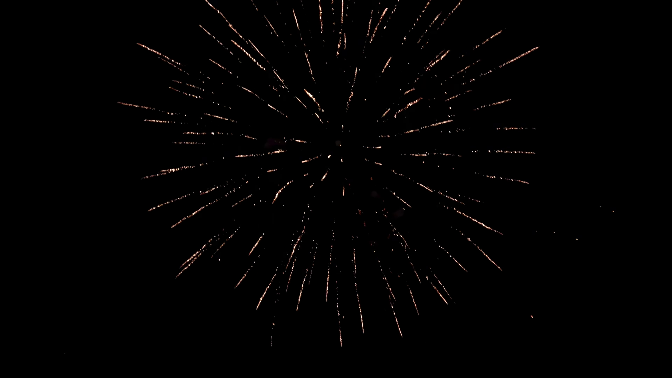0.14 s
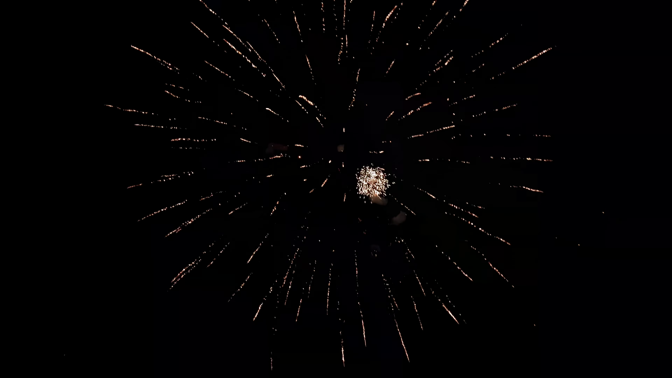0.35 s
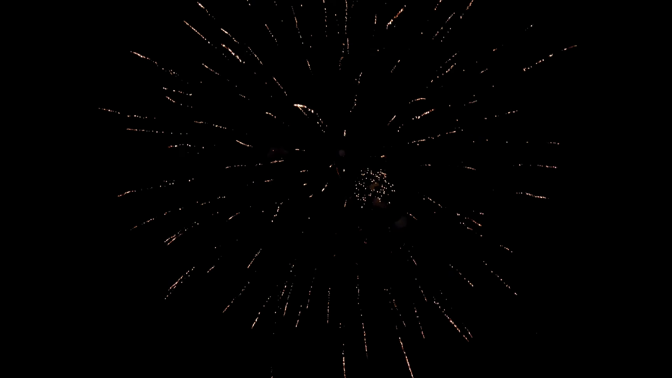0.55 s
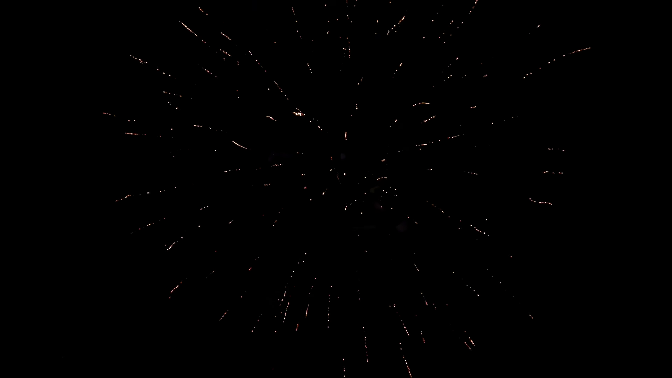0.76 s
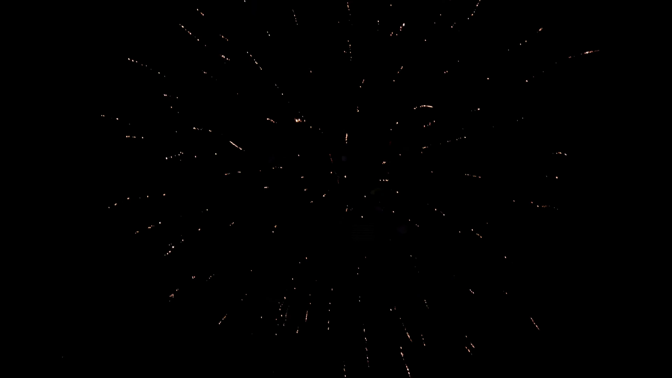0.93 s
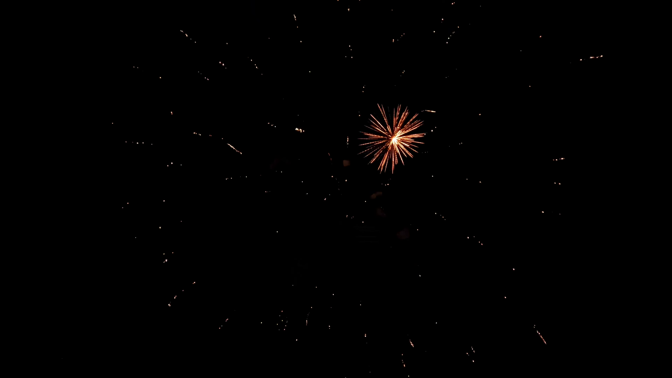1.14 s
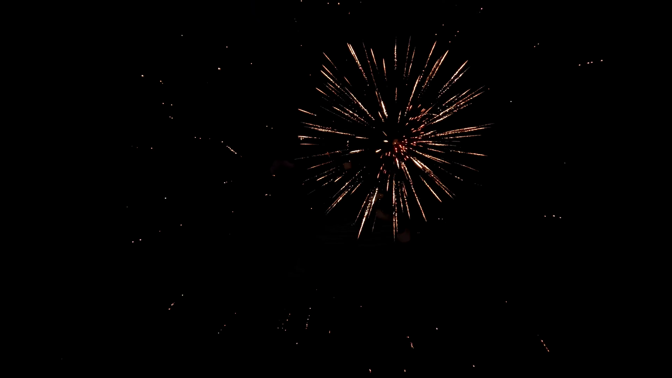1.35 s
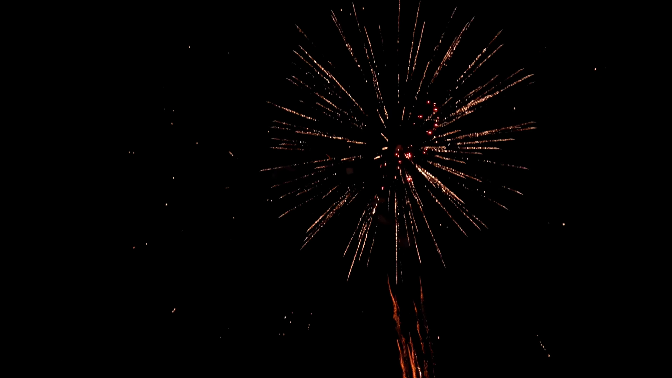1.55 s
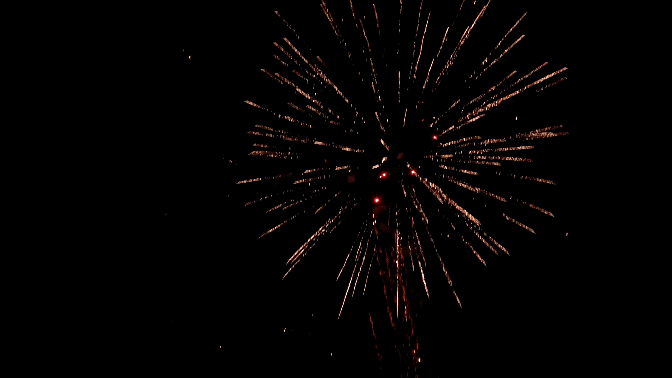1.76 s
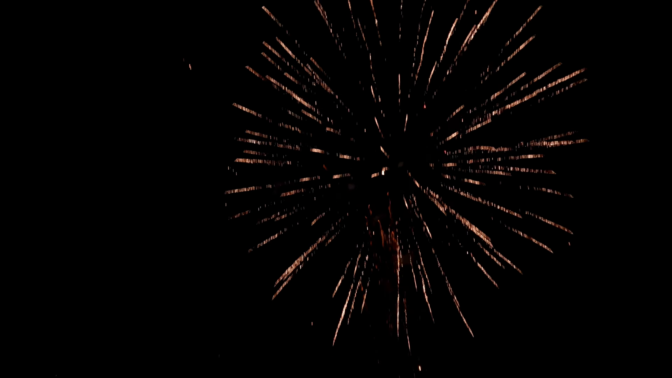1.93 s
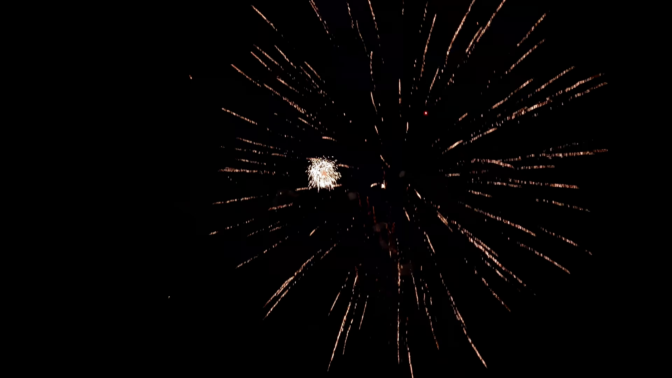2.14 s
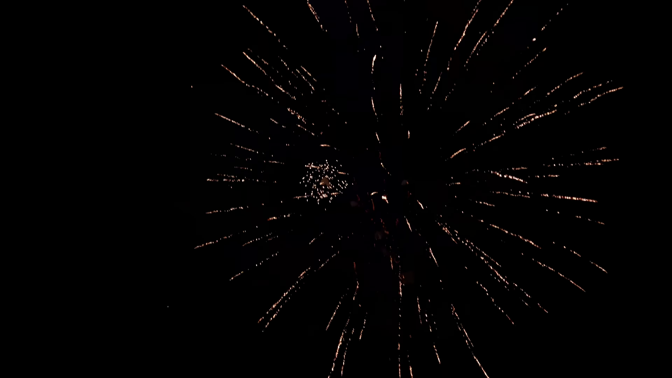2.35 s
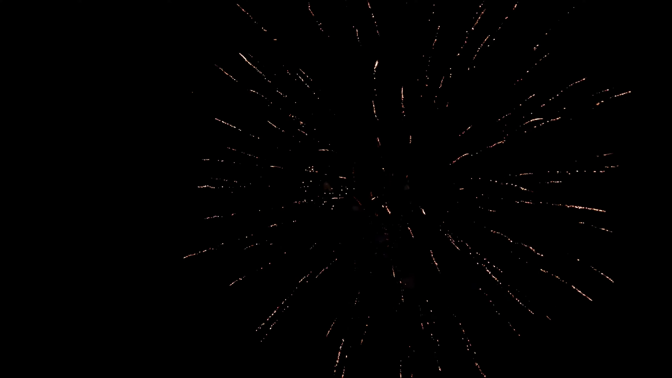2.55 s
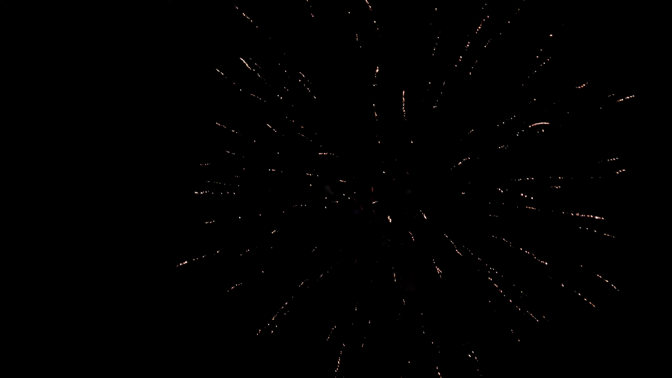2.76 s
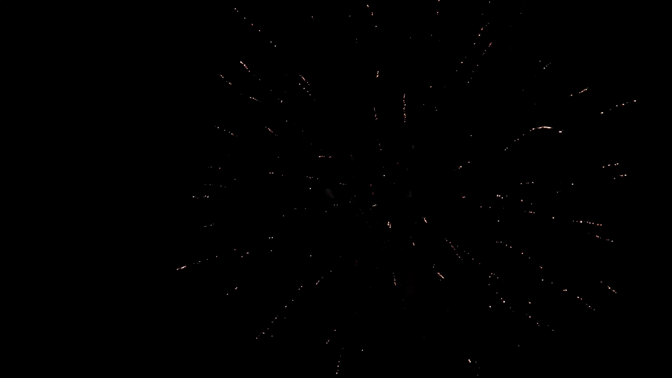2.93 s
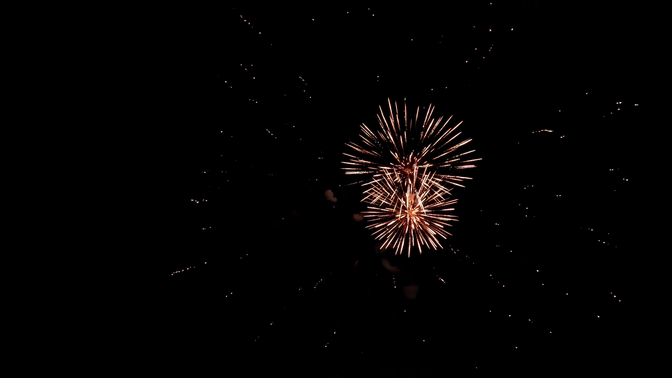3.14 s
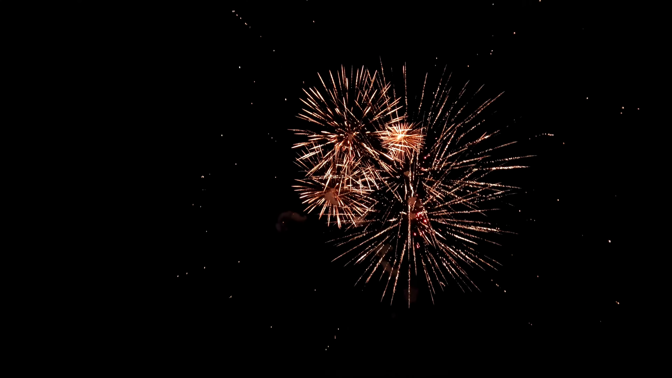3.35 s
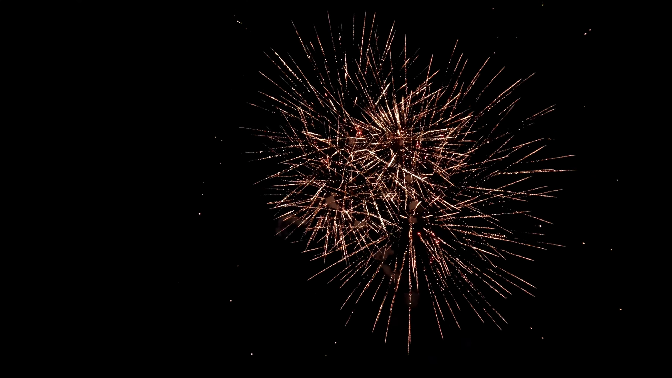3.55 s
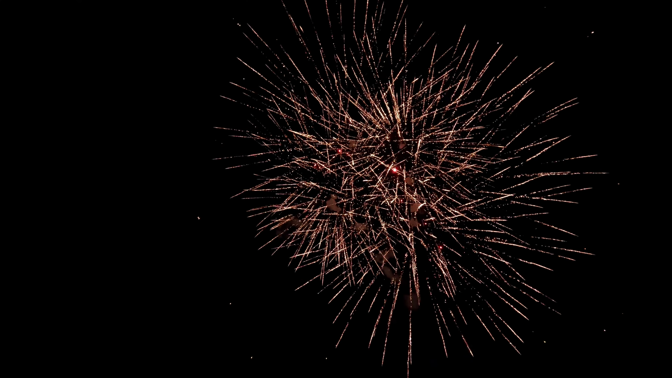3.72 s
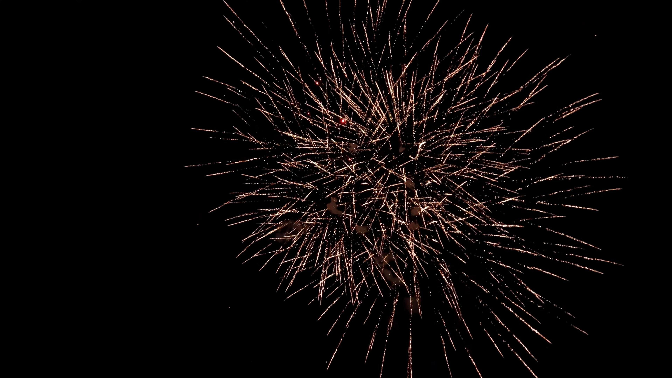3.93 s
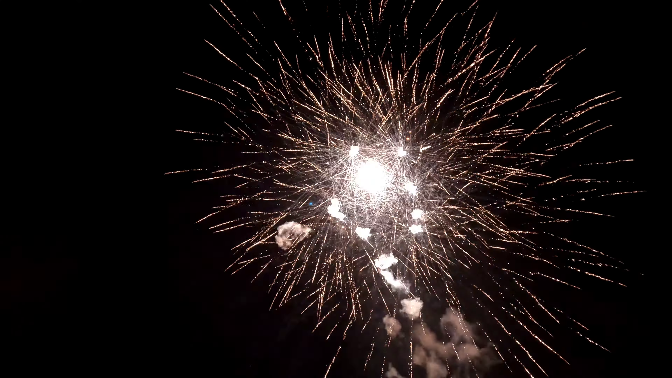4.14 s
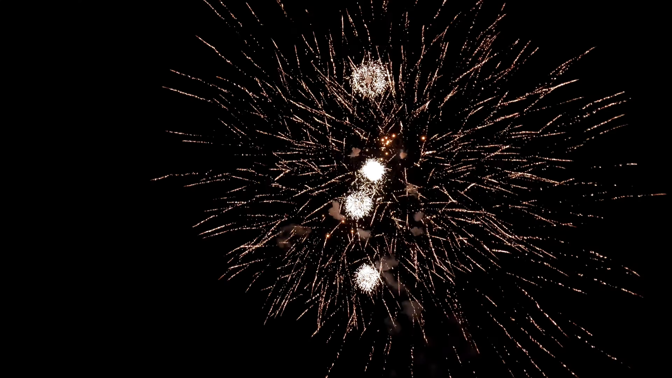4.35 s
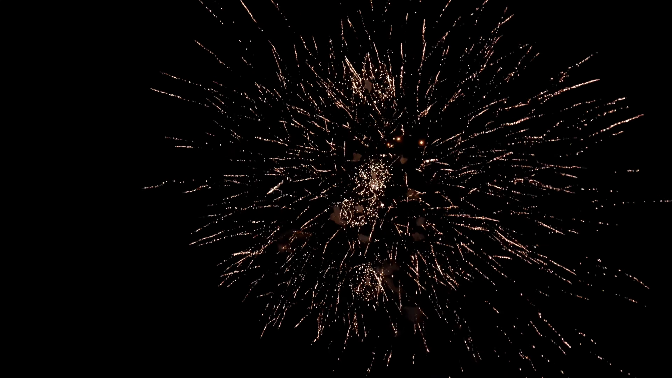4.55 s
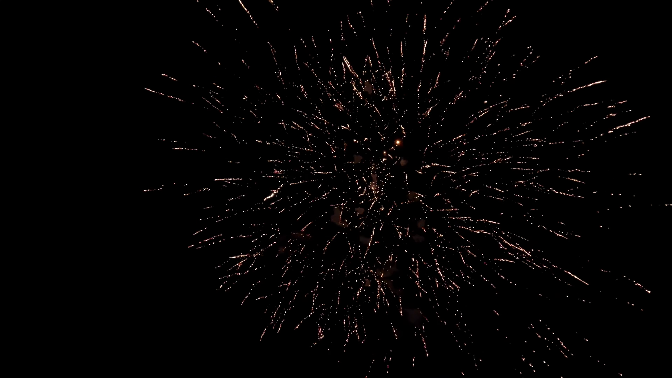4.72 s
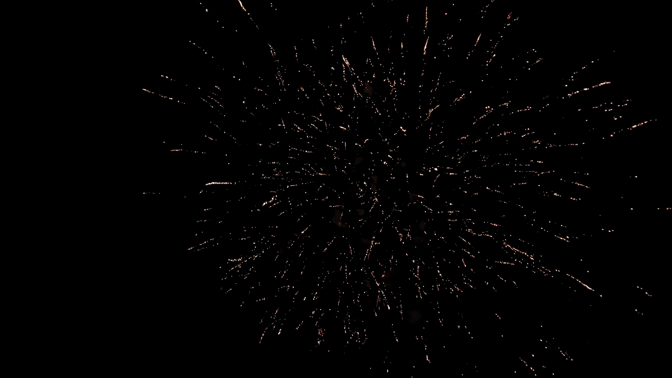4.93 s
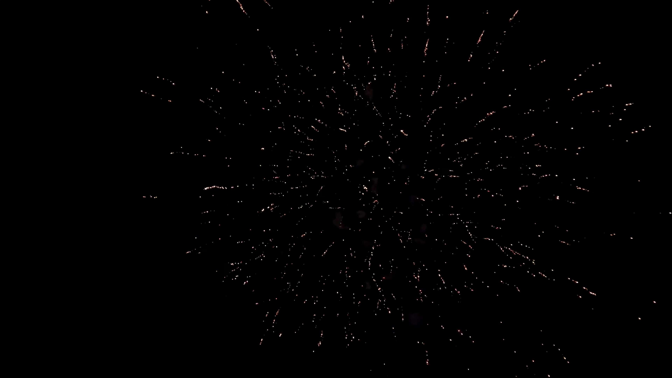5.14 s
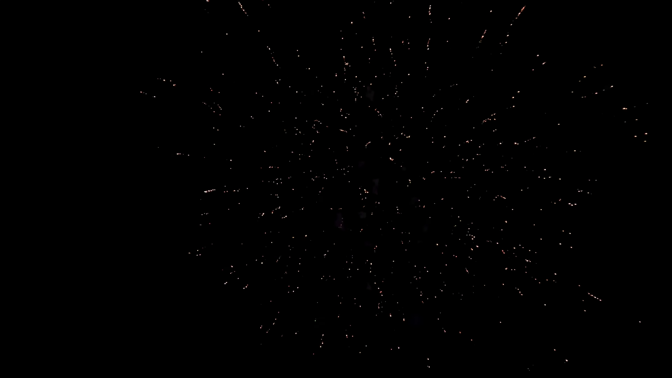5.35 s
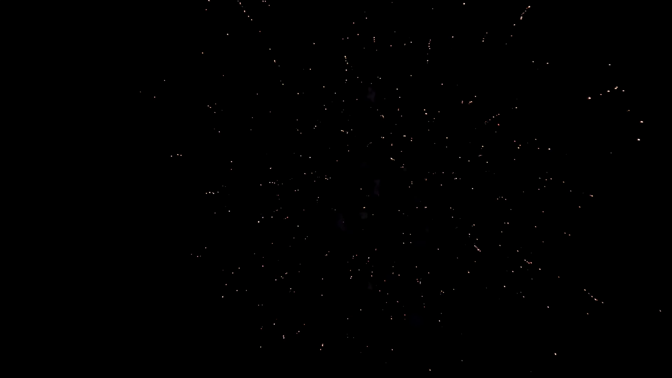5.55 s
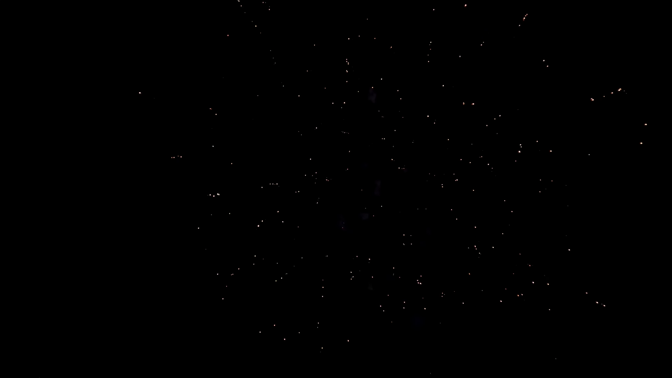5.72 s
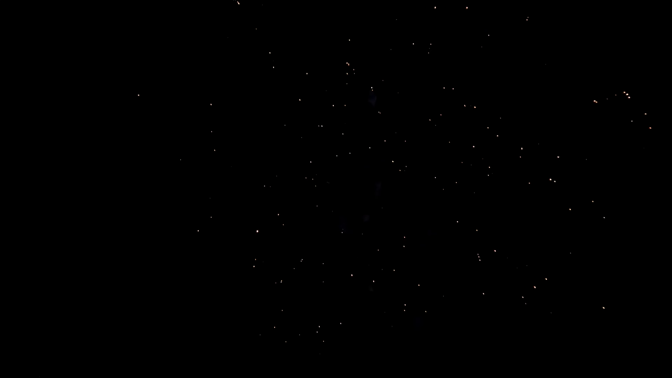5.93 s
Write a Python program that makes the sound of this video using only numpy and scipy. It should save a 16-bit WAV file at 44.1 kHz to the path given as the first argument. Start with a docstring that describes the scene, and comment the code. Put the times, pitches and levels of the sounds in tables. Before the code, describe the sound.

Fireworks go off outdoors over quiet night air, a distant rumble and the faint crackle of burning sparks. At about 0.6 seconds a shell bursts overhead with a sharp bang. From 1.4 to 1.7 seconds five launches leave their tubes in a rapid volley of spitting thumps that slap off a nearby wall, with another burst and small dry cracks among them. A single strong bang comes at 2.4 seconds. Five loud bangs crowd together between 3.4 and 3.7 seconds, and five more overlap between 4.6 and 4.8 seconds, joined by low thuds. Every blast echoes off distant obstacles and rolls away for about a second as a low rumble and a bright, hissing wash. The last echoes fade to a small crack near 5.5 seconds and a few dull, far thuds around 5.9. The sound is nearly mono, with the loudest bangs squashed.

```python
"""Firework shells bursting overhead at night, heard outdoors on a nearly mono microphone.
Each blast brings a dull reflection off the ground, then rolls away over the land as a low rumble and a
bright wash, and the same far obstacles answer every shell. Early on, five more leave the cake's tubes
in a volley that slaps off a nearby wall. Dull thuds and a few small cracks lie between,
over the night air; the recorder's limiter squashes the bangs."""
import sys
import numpy as np
from scipy import signal
from scipy.fft import rfft, irfft, next_fast_len
from scipy.io import wavfile
from scipy.ndimage import uniform_filter1d

SR = 44100
rng = np.random.default_rng(int(sys.argv[2]) if len(sys.argv) > 2 else 0)


def materialize(psi):
    """Save the field psi as 16-bit PCM at rate SR to the path in sys.argv[1].

    A 1-D psi becomes a single channel; in a 2-D psi each row is a channel.
    """
    bounded = np.clip(np.atleast_2d(psi).T, -1, 1)
    quanta = np.round(bounded * 32767).astype(np.int16)
    wavfile.write(sys.argv[1], SR, quanta)


N = 263894

# the display's roll in the distance: (time [s], rumble level [dB], wash level [dB])
DISTANT_ROLL = [(0, -39, -41.5), (.27, -41.5, -48.5), (1.3, -38.5, -45.5), (2.15, -53.5, -52),
                (3.1, -37.5, -48), (3.9, -40, -40), (4.5, -38, -44), (5.7, -38, -43.5),
                (5.98, -31.5, -44.5)]
# low thuds: (time [s], level [dB], decay [s], centre [Hz])
DULL_THUDS = [(0.489, -28.5, 0.016, 204), (1.407, -1, 0.0054, 354), (3.260, -30, 0.026, 184),
              (4.715, -13, 0.063, 143), (4.764, -10.5, 0.028, 161), (5.832, -23.5, 0.024, 222),
              (5.891, -26, 0.026, 197), (5.921, -20.5, 0.023, 394), (5.938, -22.5, 0.035, 180)]
# shells overhead: (time [s], level [dB], crack [dB re blast], shock width [s], size [ratio],
# knock pitch [Hz], rumble level [dB], wash level [dB], low far echoes [dB re rumble])
SHELLS = [(0.6260, -3.5, -0.5, 0.00043, 1.04, 1737, -23, -32, 4.5),
          (1.5030, -1.5, -2.5, 0.00011, 1.02, 690, -29.5, -38, -3),
          (2.4412, 0.5, 0, 0.00021, 1.14, 600, -19.5, -31, 1.5),
          (3.3926, 3, 0, 0.00035, 1.05, 618, -22, -35, -3),
          (3.4491, -1.5, -2, 0.000081, 1, 680, -25.5, -41, 6.5),
          (3.6314, 6.5, -2.5, 0.00042, 0.9, 655, -21.5, -48, -2),
          (3.6775, 0, -3.5, .00013, 0.96, 696, -28, -38.5, -0.5),
          (3.7319, -1.5, -3, 0.00008, .97, 690, -30, -36, 1.5),
          (4.6119, 2, 0, 0.00027, 1, 650, -24.5, -33.5, 2),
          (4.6171, -2.5, -1.5, 0.000073, 0.95, 693, -26, -40, -3),
          (4.6912, -1.5, -2.5, 0.000076, 1.31, 705, -24.5, -39, -5),
          (4.7559, -3.5, -2, 0.00011, 1.01, 690, -26, -37.5, 0.5),
          (4.7624, -7.5, -1.5, 0.000087, 1.09, 680, -28, -39.5, -0.5)]
# short dry cracks and bright echoes: (time [s], level [dB], decay [s], treble corner [Hz])
SMALL_CRACKS = [(.646, -21, 0.002, 5000), (.783, -27, 0.0016, 4000), (1.4531, -24, 0.0016, 3970),
                (1.5328, -12, 0.0014, 5000), (1.547, -15, 0.0038, 3480), (1.6038, -18, .002, 4000),
                (1.611, -19, 0.0021, 5000), (2.623, -28, 0.0056, 4500), (2.985, -37, .012, 4500),
                (3.04, -37, .016, 4500), (3.878, -30.5, 0.022, 4520), (4.6991, -13, 0.00071, 7050),
                (4.711, -22, 0.014, 4500), (4.729, -15, .002, 3200), (5.479, -24.5, 0.002, 2770),
                (5.921, -25.5, 0.0038, 2630)]
# far obstacles: (delay [s], low echo [dB re shell's rumble], bright echo [dB re shell's wash])
OBSTACLES = [(.028, -2, -6), (.118, -15, -14), (.172, -0.5, 1.5), (.290, 0.5, -13), (.408, -10, -5.5),
             (.492, -11.5, -7.5), (.545, -22, -11.5)]
# lift charges in the tubes: (time [s], thump level [dB], gas spit level [dB], report level [dB],
# wall echo [dB re thump], rumble level [dB], wash level [dB])
LIFT_CHARGES = [(1.4240, 0, -11.5, 6.5, -.5, -20, -29), (1.4740, -1, -20.5, -6, -3, -28, -30),
                (1.5339, -2.5, -21, -12, -5, -25, -36.5), (1.5847, -0.5, -14.5, -6, -4, -28.5, -37.5),
                (1.6330, -0.5, -17, -5, -3, -25.5, -37.5)]
# spectra of low and bright echoes, night air, shell crack and escaping gas: (frequency [Hz], level [dB])
RUMBLE_SPECTRUM = [(25, -39), (50, -32), (80, -7), (115, -8), (155, 2), (195, 0.5), (245, 1), (330, -9),
                   (550, -15.5), (900, -24), (2000, -30), (5000, -65)]
WASH_SPECTRUM = [(100, -22), (350, 8.5), (600, 3), (1000, -2.5), (2000, -2), (3000, -4), (4100, -5.5),
                 (5200, -13.5), (7300, -17), (8800, -32.5), (11000, -44), (15000, -71.5)]
AIR_SPECTRUM = [(20, -38), (60, -1.5), (190, -8), (270, -2.5), (420, -10), (750, -17), (1500, -15.5),
                (3600, -23), (7000, -36.5), (12000, -92)]
CRACK_SPECTRUM = [(300, -26), (700, -16), (1100, 1.5), (1900, 8), (3700, 11.5), (5200, 0.5), (7000, 0),
                  (10000, -10.5), (14500, -21)]
SPIT_SPECTRUM = [(300, -12), (900, 6.5), (1900, 5.5), (2900, 7), (4200, 3.5), (5300, -7), (7500, -7.5),
                 (10000, -30.5), (14500, -34)]
# how long the wash hangs over the land: (frequency [Hz], time to fall 60 dB [s])
WASH_DECAY = [(300, 1.23), (1000, 1.5), (3000, 1.49), (5000, 1.35), (8000, 0.93), (14000, 0.16)]
# stereo width at the microphone: (frequency [Hz], side level [dB re mid])
STEREO_WIDTH = [(25, -24), (70, -36), (250, -52), (500, -37.5), (1000, -36), (4000, -28.5), (8000, -12),
                (12000, -10)]


def amp(db):
    return 10 ** (np.asarray(db) / 20)


def unit_rms(x):
    return x / np.sqrt(np.mean(x ** 2) + 1e-20)


def curve_at(points, hz):
    point_hz, value = np.transpose(points)
    return np.interp(np.log(hz + 1), np.log(point_hz + 1), value)


def add(mix, start_s, sound):
    part = mix[max(round(start_s * SR), 0):][:len(sound)]
    part += sound[:len(part)]


def colour(x, spectrum):
    """Filters x by a spectrum of (frequency [Hz], level [dB]) points."""
    size = next_fast_len(len(x), real=True)
    gain = amp(curve_at(spectrum, np.fft.rfftfreq(size, 1 / SR)))
    return irfft(rfft(x, size) * gain, size)[:len(x)]


def noise(spectrum, size):
    return unit_rms(colour(rng.standard_normal(size), spectrum))


def lowpass(x, hz, order=2):
    return signal.sosfilt(signal.butter(order, min(hz, .45 * SR), fs=SR, output="sos"), x)


def flutter(size, rate_hz, depth_db):
    """A random gain that breaks a sound into clumps."""
    knots = np.arange(size) * rate_hz / SR
    return amp(depth_db * np.interp(knots, np.arange(2048), rng.standard_normal(2048)))


def night_ambience(pops_per_s=170, pop_s=0.0054, pops_db=-14, air_db=-51.5):
    """Open night air, the distant roll of earlier shots and the faint crackle of burning stars."""
    times, *levels = np.transpose(DISTANT_ROLL)
    roll_gain, hiss_gain = (amp(np.interp(np.arange(N) / SR, times, db)) for db in levels)
    roll = roll_gain * noise(RUMBLE_SPECTRUM, N) * flutter(N, 23, 3.2)
    pops = (rng.random(N) < pops_per_s / SR) * rng.uniform(.2, 1, N)
    sparks = unit_rms(signal.lfilter([1], [1, -np.exp(-1 / (pop_s * SR))], pops))
    grain = flutter(N, 60, .8) + amp(pops_db) * sparks
    hiss = hiss_gain * lowpass(noise(WASH_SPECTRUM, N) * grain, 4000)
    return roll + hiss + amp(air_db) * noise(AIR_SPECTRUM, N)


def thud(db, decay_s, hz, rise_s=0.0029):
    """A dull bang of noise, falling off by the octave around its centre."""
    t = np.arange(8192) / SR
    hump = [(hz / 4, -60), (hz / 1.15, 0), (hz * 1.15, 0), (hz * 64, -110)]
    return amp(db) * noise(hump, len(t)) * (1 - np.exp(-t / rise_s)) ** 2 * np.exp(-t / decay_s)


def dull_thuds():
    """Low thuds: one just before the volley, others from far off."""
    out = np.zeros(N)
    for start, db, decay_s, hz in DULL_THUDS:
        add(out, start, thud(db, decay_s, hz))
    return out


def blast(t, low_hz=190, sweep_hz=670, sweep_s=.0015, length_s=.0078):
    """A pressure swing that slows as the low frequencies lag behind."""
    age = np.maximum(t, 0)
    turns = low_hz * age + sweep_hz * sweep_s * (1 - np.exp(-age / sweep_s))
    return (t >= 0) * .66 * np.cos(2 * np.pi * turns) * np.exp(-(age / length_s) ** 3)


def shock(t, width_s):
    """A steep front followed by suction."""
    widths = np.maximum(t, 0) / width_s
    return (t >= 0) * (1 - widths) * np.exp(-widths)


def ring(t, hz, decay_s):
    """A damped swing that starts at t = 0."""
    age = np.maximum(t, 0)
    return np.sin(2 * np.pi * hz * age) * np.exp(-age / decay_s)


def shell_crack(t, width_s, knock_hz, rear_s=0.001736, debris_s=0.0019, wide_s=0.00033):
    """Two shock fronts; a wider shock drags more debris noise and woody knock behind it."""
    fronts = 1.76 * shock(t, width_s) + 0.69 * shock(t - rear_s, width_s)
    debris = amp(-8) * noise(CRACK_SPECTRUM, len(t)) * np.exp(-t / debris_s)
    knock = amp(-3.5) * ring(t + 0.00054, knock_hz, decay_s=.0026)
    return fronts + np.sqrt(width_s / wide_s) * (debris + knock)


def shell_bursts(ground_s=0.00751, ground_hz=330, octaves_per_db=0.32):
    """Shells overhead: blast and crack reach the microphone first, then the reflections and tails."""
    out, t = np.zeros(N), np.arange(2048) / SR
    for start, db, crack_db, width_s, size, knock_hz, rumble_db, wash_db, _ in SHELLS:
        crack = amp(crack_db) * shell_crack(t, width_s, knock_hz)
        top_hz = 5850 * 2 ** (octaves_per_db * crack_db)  # a stronger crack is brighter
        direct = lowpass(blast(t / size) + crack, top_hz)  # a bigger shell swings more slowly
        ground = amp(0.5) * lowpass(blast((t - ground_s) / size), ground_hz, order=3)
        add(out, start, amp(db) * (direct + ground))
        for lag_s in (.009, .0198):  # two faint reflections from close by
            add(out, start + lag_s, amp(db - 20) * lowpass(crack, 5200, order=8))
        add(out, start, rumble(rumble_db))
        add(out, start, wash(wash_db, swell_s=0.19, early=0.82, slap=0.13, grain_db=1.47))
    return out


def rumble(db, rise_s=0.0015, thump_s=0.084, roll_s=0.22, roll_db=-5):
    """Low echoes from the land around: a quick thump and a long, lumpy roll."""
    t = np.arange(2 * SR) / SR
    shape = (1 - np.exp(-t / rise_s)) * (np.exp(-t / thump_s) + amp(roll_db) * np.exp(-t / roll_s))
    roll = amp(db) * shape * noise(RUMBLE_SPECTRUM, len(t)) * flutter(len(t), 44.5, 2.35)
    return lowpass(roll, 3500, order=4)


def wash(db, swell_s, early, slap, grain_db, slap_s=0.0074):
    """Countless small echoes of the crack swell, then die treble first; slap adds a smeared far echo."""
    t = np.arange(2 * SR) / SR
    hz, frame_s, spectra = signal.stft(noise(WASH_SPECTRUM, len(t)), SR, nperseg=256)
    fade = amp(-60 * np.maximum(frame_s - swell_s, 0) / curve_at(WASH_DECAY, hz)[:, None])
    echoes = signal.istft(spectra * fade, SR, nperseg=256)[1][:len(t)]
    swell = np.interp(t, [0, .015, swell_s], [0, early, 1])
    swell += slap * np.exp(-((t - swell_s) / slap_s) ** 2)
    grainy = swell * echoes * flutter(len(t), 70, 0.6) * flutter(len(t), 900, grain_db)
    return amp(db) * lowpass(grainy, 8840, order=8)  # almost no hiss above 9 kHz


def snap(db, decay_s, top_hz=5500):
    """A short, grainy crack."""
    t = np.arange(4096) / SR
    grains = noise(WASH_SPECTRUM, len(t)) * np.exp(-t / decay_s) * flutter(len(t), 820, 2.0)
    return amp(db) * lowpass(grains, top_hz, order=6)


def small_cracks():
    """Short dry cracks, and bright echoes of the bangs and launches."""
    out = np.zeros(N)
    for start, db, decay_s, top_hz in SMALL_CRACKS:
        add(out, start, snap(db, decay_s, top_hz))
    return out


def far_echoes(rebound_hz=260, rebound_db=6.5, smear_db=-4):
    """Far obstacles each return every shell: a dulled blast, a smeared thud and a little of the crack."""
    out = np.zeros(N)
    rebound = lowpass(blast(np.arange(2048) / SR), rebound_hz, order=3)
    for start, *_, rumble_db, wash_db, echo_db in SHELLS:
        for delay_s, low_db, bright_db in OBSTACLES:
            arrival = start + delay_s
            return_db = rumble_db + echo_db + low_db
            add(out, arrival, amp(return_db + rebound_db) * rebound)
            add(out, arrival, thud(return_db + smear_db, decay_s=0.032, hz=207))
            add(out, arrival, snap(wash_db + bright_db, decay_s=0.022))
    return out


def tube_launches(lead_s=.009, spit_s=0.0043, spit_lead_s=0.00048, report_s=0.0027, wall_s=.0134):
    """Each tube spits gas, then cracks and thumps as the shell leaves; a nearby wall answers twice."""
    out, t = np.zeros(N), np.arange(4096) / SR - lead_s
    push = np.clip(t / 0.0013, 0, 1) * np.exp(-t / 0.006)  # gas escapes more gently than a shell breaks
    spit_shape = np.exp(-((t + spit_lead_s) / spit_s) ** 2)
    for start, db, spit_db, report_db, wall_db, rumble_db, wash_db in LIFT_CHARGES:
        thump = amp(db + 5.5) * lowpass(blast(t) * push, 800)
        spit = amp(spit_db) * noise(SPIT_SPECTRUM, len(t)) * flutter(len(t), 1190, 2) * spit_shape
        report = amp(report_db) * lowpass(shock(t - report_s, width_s=0.00008), 5000, order=4)
        sharp = spit + report
        boom = -amp(db - 16) * ring(t, hz=125, decay_s=0.022)  # the air in the tube
        add(out, start - lead_s, thump + sharp + boom)
        add(out, start - lead_s + wall_s, amp(wall_db) * thump + amp(-12) * sharp)
        add(out, start - lead_s + 2 * wall_s, amp(wall_db - 9) * thump + amp(-20) * sharp)
        add(out, start, rumble(rumble_db))
        add(out, start, wash(wash_db, swell_s=0.11, early=1.0, slap=0, grain_db=3))
    return out


def scene():
    """At the microphone only a faint diffuse part differs between the sides, mostly in the treble."""
    mid = shell_bursts() + tube_launches() + far_echoes()
    mid = mid + dull_thuds() + small_cracks() + night_ambience()
    scatter = rng.standard_normal(512) * np.hanning(1024)[512:]
    diffuse = signal.oaconvolve(mid, scatter / np.linalg.norm(scatter))[:N]
    side = colour(diffuse, STEREO_WIDTH)
    return np.array([mid + side, mid - side])


def record(dry, limit_db=5.0, recovery_db_per_s=100, knee=.5, headroom=.47, edge_hz=14900):
    """The recorder: a limiter ducks at loud bangs, peaks round off, and the highest treble is cut."""
    peak_db = 20 * np.log10(abs(dry).max(0) + 1e-9)
    fall_db = np.arange(N) * recovery_db_per_s / SR
    held_db = np.maximum.accumulate(peak_db + fall_db) - fall_db
    over_db = np.maximum(held_db - limit_db, 0)
    ducked = dry / amp(uniform_filter1d(uniform_filter1d(over_db, size=24), size=20))
    clean = np.clip(ducked, -knee, knee)
    rounded = clean + headroom * np.tanh((ducked - clean) / headroom)
    band_limit = signal.firwin(511, edge_hz, window=("kaiser", 9), fs=SR)
    return signal.oaconvolve(rounded, band_limit[None], "same")


dry = scene()
out = record(dry)
materialize(out)
```